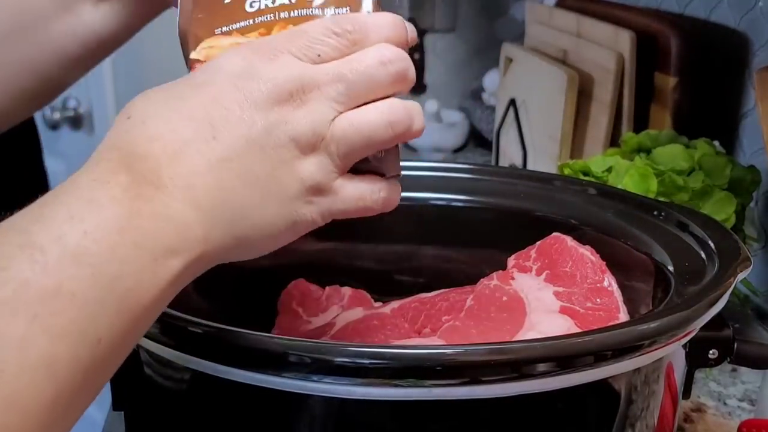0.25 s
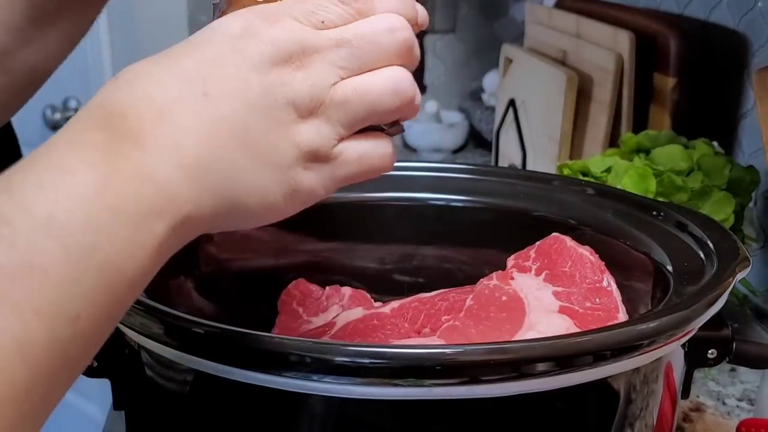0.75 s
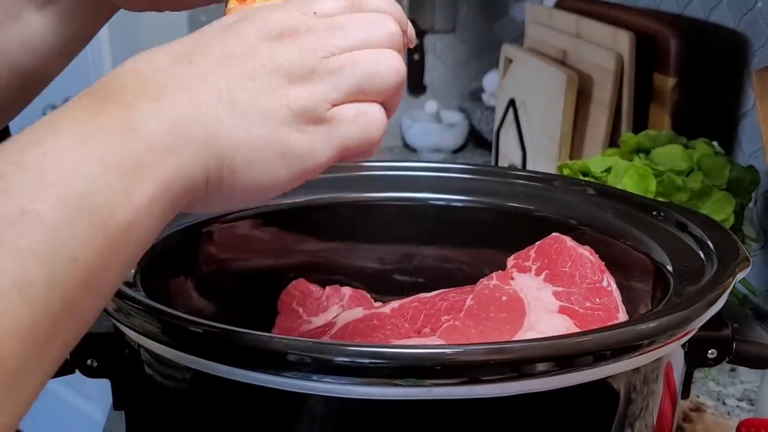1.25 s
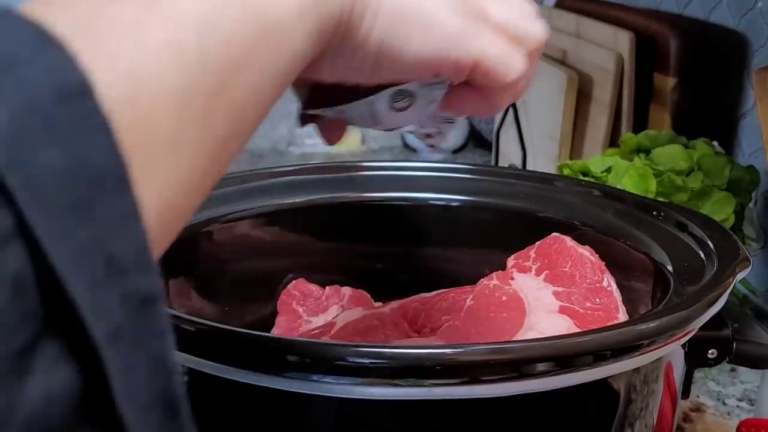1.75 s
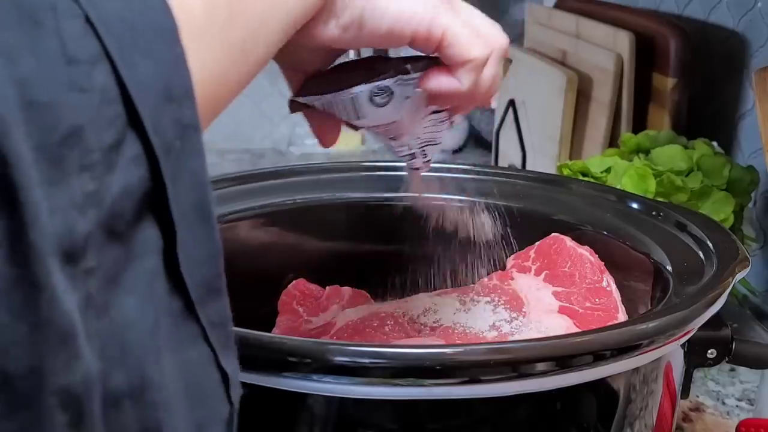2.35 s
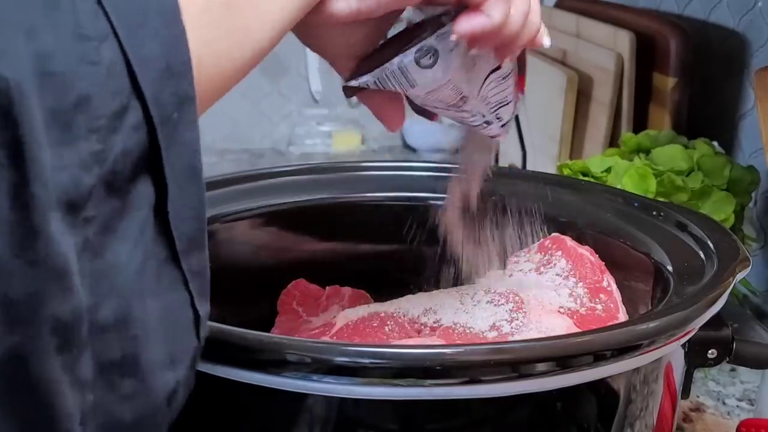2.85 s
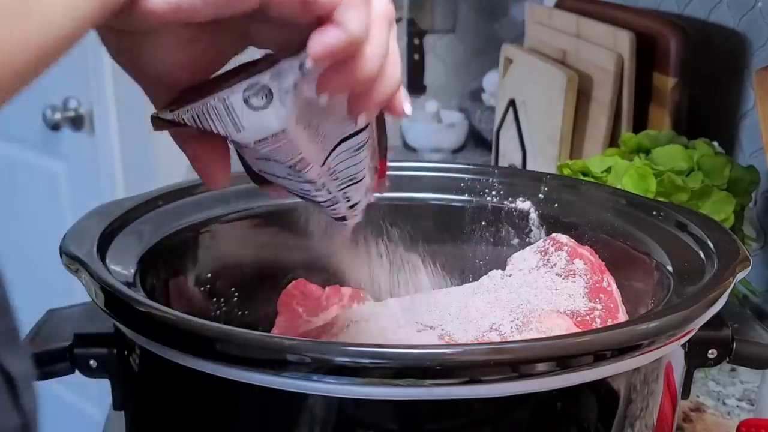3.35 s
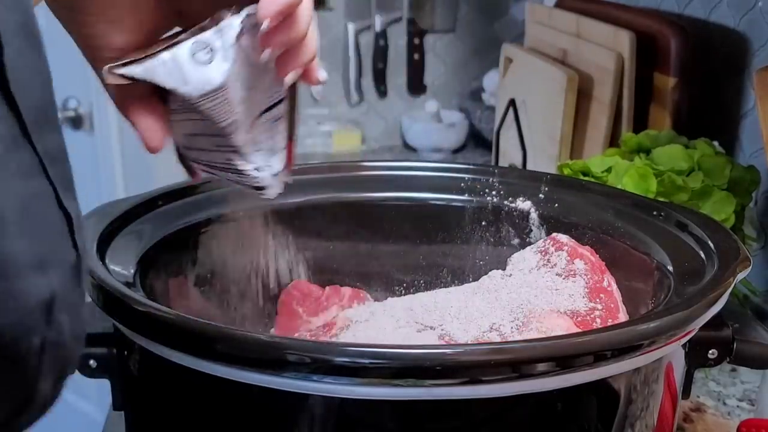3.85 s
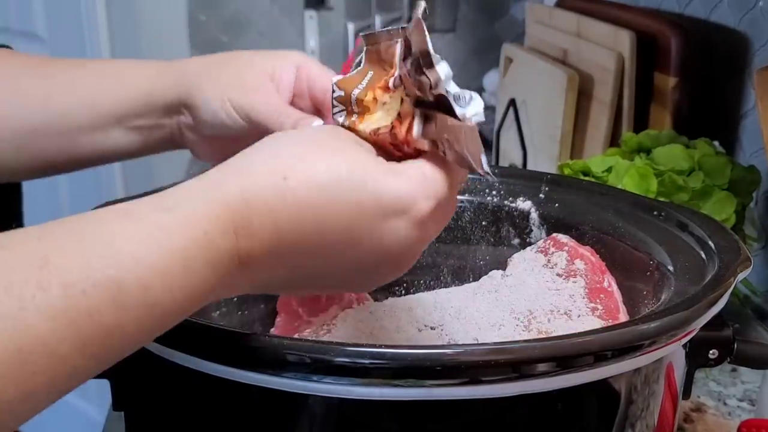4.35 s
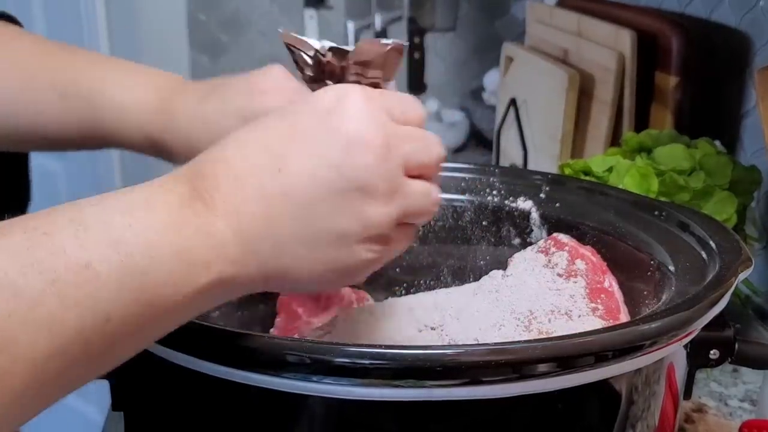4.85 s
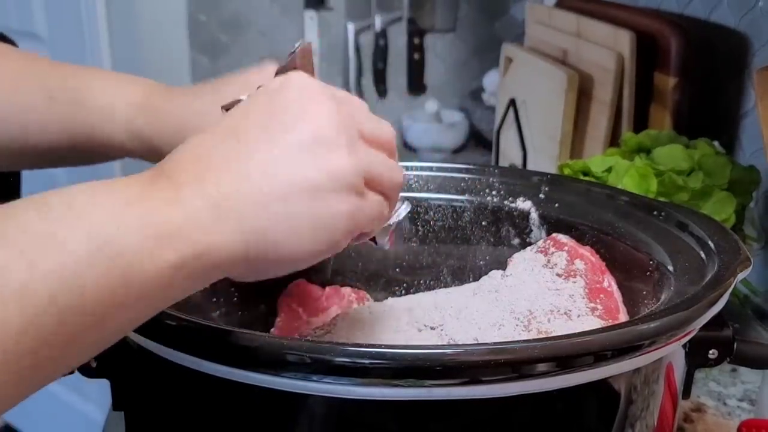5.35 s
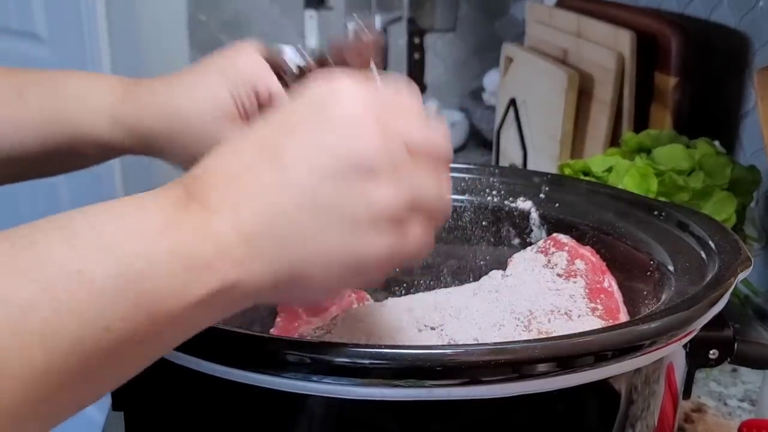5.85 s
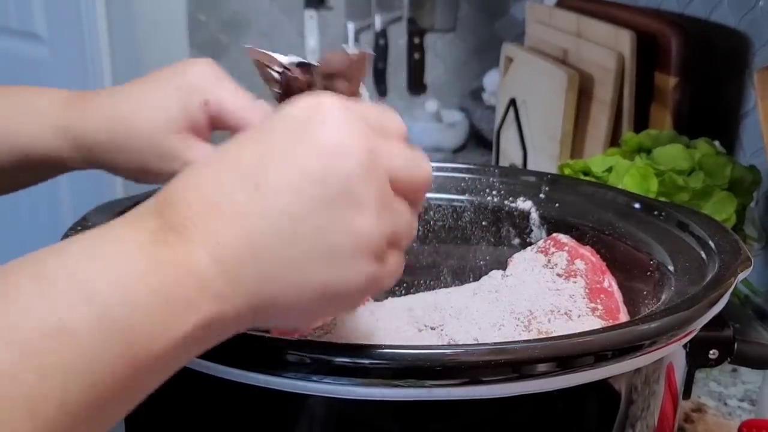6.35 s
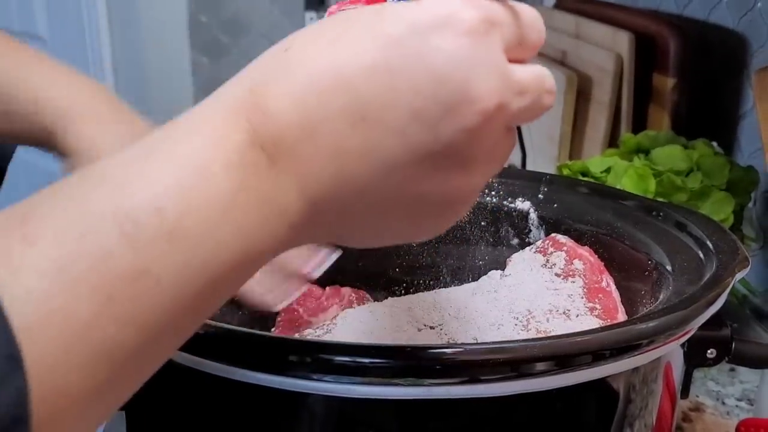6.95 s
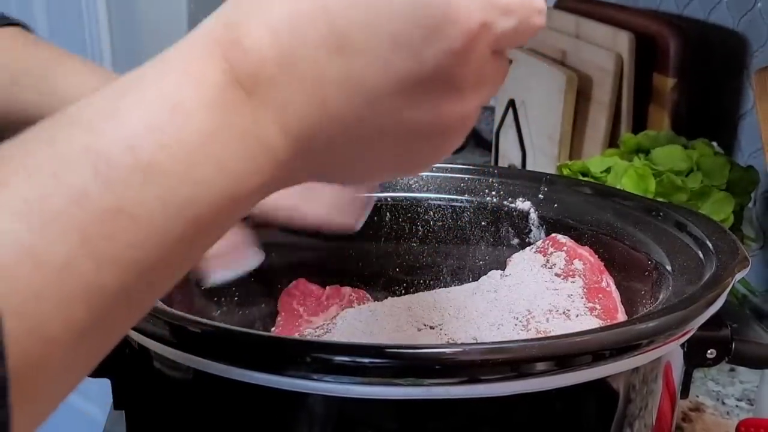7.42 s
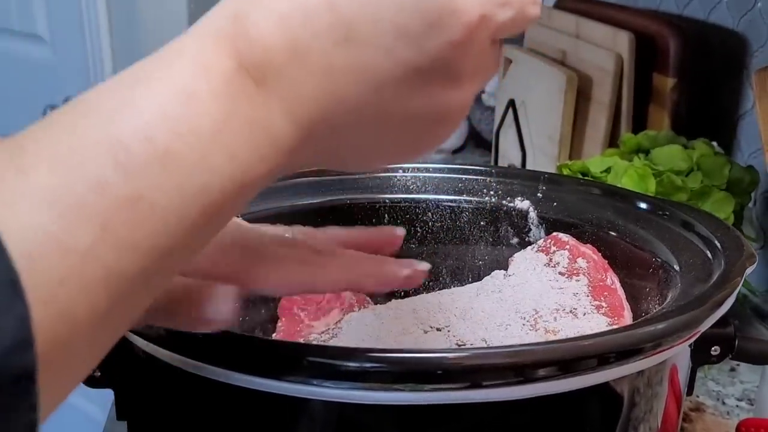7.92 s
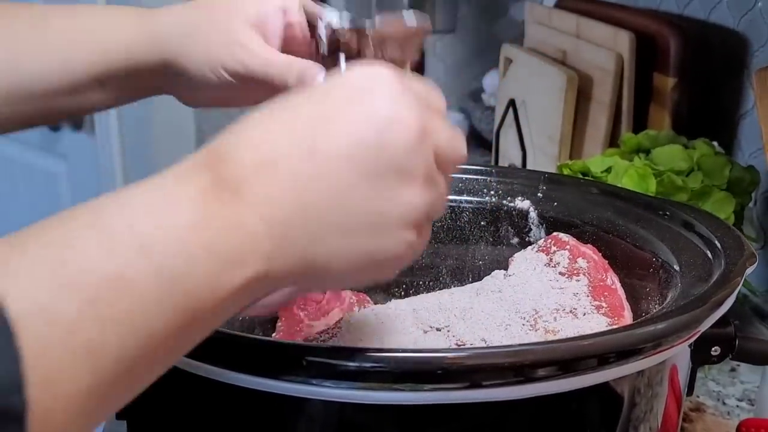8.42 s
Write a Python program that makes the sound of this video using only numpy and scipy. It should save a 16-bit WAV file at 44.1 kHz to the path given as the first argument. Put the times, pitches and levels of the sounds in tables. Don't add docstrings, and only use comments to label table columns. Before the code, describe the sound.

A stiff paper and foil packet pops and crackles near the microphones for a second and a half. After a brief lull, dry powder swishes out in quick shakes, fine and airy. Light crinkling and two louder creases follow, then several dull knocks on a thick ceramic pot with small high ticks and low wobble. The room is small and quiet, with soft air, floor rumble and distant hum.

```python
import sys
import numpy as np
from scipy import signal
from scipy.fft import rfft, irfft
from scipy.io import wavfile

SR = 44100
rng = np.random.default_rng(int(sys.argv[2]) if len(sys.argv) > 2 else 0)


def persist_wave(psi):
    counts = np.round(np.clip(psi, -1, 1) * 32767).astype(np.int16)
    wavfile.write(sys.argv[1], SR, np.atleast_2d(counts).T)


def voltage_ratio(level):
    return 10 ** (np.asarray(level, float) / 20)


N = 382788

# t/s, peak level/dB, panel f/Hz, t60/s, hollow thump against the peak level/dB
FOLDS = [(0.043, -26.5, 2810, 0.048, -16), (0.27, -24, 2150, 0.043, -19), (0.402, -50.5, 1100, 0.06, 6),
         (0.45, -25.5, 1480, 0.053, -8), (0.742, -33.5, 1160, 0.078, -8), (0.756, -22, 2120, 0.045, -10),
         (1.156, -39, 1320, 0.1, -36), (1.226, -33, 1920, 0.049, -3), (1.249, -24, 1973, .081, -5.5),
         (1.334, -26.5, 1180, 0.055, -20), (1.378, -18, 1400, 0.027, -20), (1.482, -45, 1310, 0.042, -25),
         (4.197, -33.5, 2490, 0.05, -18), (5.298, -45.5, 2930, 0.051, 1), (5.819, -48.5, 1360, .049, 2),
         (6.215, -38, 2914, 0.15, -13), (8.668, -32, 1420, .03, -9)]
# t/s, peak level/dB, panel f/Hz, crack and hollow thump against it level/dB
CRACKS = [(0.318, -35.5, 1330, -2, 6), (0.511, -20.5, 1310, -14, -16), (0.535, -15.5, 1205, -19, -13),
          (0.597, -28, 1394, -13, -9), (1.032, -41, 1330, -5, -3), (1.254, -26, 2024, -14, -2),
          (1.424, -44.5, 1940, -2, -4), (1.459, -32, 1065, -11, -21), (1.666, -43.5, 1390, -9, -15),
          (3.717, -51, 2600, 4.5, -29), (4.187, -43, 1620, 0, -5), (4.534, -45, 1820, -1, 1),
          (4.658, -39.5, 2660, -2.5, -11), (4.704, -43, 2950, -1, -15), (4.742, -42.5, 3600, -1, -25),
          (4.789, -38, 2500, 2, -9), (4.814, -35.5, 1260, -11, -21), (5.05, -49, 2990, -0.5, 7.5),
          (5.458, -47.5, 2620, 2.5, -7), (5.52, -26.5, 1350, -9, -8), (5.571, -16.5, 1553, -14, -12),
          (5.71, -29, 1540, -9, -0.5), (5.734, -29, 2150, -12, -8.5), (6.388, -32.5, 2500, -13, -38)]


def snaps():
    fold_crack_db = -41
    found = [(s, db, hz, fold_crack_db, t60, hollow) for s, db, hz, t60, hollow in FOLDS]
    for s, db, hz, crack, hollow in CRACKS:
        t60 = .057 + .0005 * (db + 38.5)
        found.append((s, db, hz, crack, t60, hollow))
    return sorted(found)


# t/s, left-right level/dB
HAND_SIDE = [
    (0, -0.5),
    (1.4, 0),
    (1.7, 2.5),
    (8.68, -6.5),
]


def creases():
    panel_ratios, panel_width_hz, panel_db = (.56, 1.05, 1.4, 2.05), 118, -0.5
    size = 6000
    out = np.zeros((2, N))
    for s, peak_db, hz, crack_db, t60, hollow_db in snaps():
        click = np.zeros((2, size))
        click[:, [40, rng.integers(70, 130), rng.integers(140, 240)]] = 1, -.45, .3
        ring = band(click, hz / 2.6, hz * 1.45, order=3)
        ring = ring + voltage_ratio(-5) * band(click, hz / 1.22, hz * 1.18)

        rough = burst(t60, size) * voltage_ratio(2.04 * rng.exponential(1, size))
        driven = rough + 9 * click
        tones = sum(resonate(driven, hz * ratio, panel_width_hz) for ratio in panel_ratios)
        flutter = band(rough, hz / 2.45, hz * 1.467, order=3)
        flutter = peak_one(flutter + voltage_ratio(panel_db) * peak_one(tones))

        slow = np.clip(t60 / .15, .15, .9)
        hollow = band(driven, 310, 947, order=3)
        crack = band(burst(t60, size), 1900, 8700)
        snap = peak_one((1 - slow) * ring + slow * flutter)
        snap = snap + voltage_ratio(hollow_db) * hollow + voltage_ratio(crack_db) * crack
        add(out, s, snap, peak_db + 2.5, np.interp(s, *np.transpose(HAND_SIDE)))
    return out


# t/s, peak level/dB, f/Hz
PIPS = [
    (2.4055, -48, 1825),
    (2.5591, -54, 2150),
    (2.599, -48, 1850),
    (2.7563, -48, 1810),
]


def pips():
    out = np.zeros((2, N))
    for s, peak_db, hz in PIPS:
        ring = modes([(hz, 0, .07)], size=4000, spread_db=0, detune=0)
        add(out, s, ring[[0, 0]], peak_db, -1.5)
    return out


# peak t/s, hiss level/dB, rise t/s, fall t/s, body against hiss level/dB
RUBS = [(0.02, -52.5, 0.24, 0.13, 7), (0.69, -66, 0.19, 0.09, 16), (0.775, -69, 0.084, 0.056, 16),
        (0.845, -57, 0.053, 0.059, 8), (1.09, -58, 0.08, 0.12, 14.5), (1.28, -72, 0.13, .15, 13),
        (1.66, -70.5, 0.25, 0.095, 12.5), (4.2, -55.5, 0.047, 0.13, 9), (4.71, -55, 0.12, 0.1, 2.5),
        (4.81, -61, 0.19, 0.17, 9), (5.07, -70, 0.16, .05, 10.5), (5.19, -61, 0.036, 0.072, 5.5),
        (5.735, -60, 0.057, 0.11, 13), (5.96, -69, 0.3, 0.083, 11.5), (6.08, -70.5, 0.076, 0.063, 15),
        (6.5, -63, 0.02, 0.088, -7), (6.58, -62, 0.18, 0.063, 5.5), (6.89, -66.5, .16, 0.11, -1),
        (6.8, -66.5, 0.0085, 0.13, 15), (7.61, -72, .04, 0.077, 10), (7.92, -68, 0.23, 0.23, 9),
        (8.27, -64.5, 0.14, 0.063, -5), (8.465, -75, 0.02, 0.046, 3), (8.555, -78, 0.035, 0.054, 7)]


def rubbing_powers():
    rest_db, rest_body_db = -83, 10
    s, rub_db, rise_s, fall_s, body_db = np.transpose(RUBS)
    snap_s, snap_db, _, crack_db = np.transpose(snaps())[:4]
    tap_s, tap_db = np.transpose(TAPS)[:2]

    hiss = swells(s, rub_db, rise_s, fall_s) + voltage_ratio(2 * rest_db)
    hiss = hiss + swells(snap_s, snap_db + crack_db - 27, 0, 0.1)
    hiss = hiss + swells(tap_s, tap_db - 42, 0, 0.1)

    panels = swells(s, rub_db + body_db, rise_s, fall_s) + voltage_ratio(2 * (rest_db + rest_body_db))
    panels = panels + swells(snap_s, snap_db - 31.5, 0, 0.091)
    return hiss, panels


# t/s, hiss level/dB
POUR = [
    (1.9, -95),
    (2.15, -72),
    (2.7, -68),
    (3.0, -63),
    (3.3, -65.5),
    (3.7, -70),
    (3.9, -77),
    (4.14, -66.5),
    (4.3, -92),
]
# peak t/s, hiss level/dB
SHAKES = [(1.96, -66), (1.995, -64), (2.115, -59.5), (2.335, -71), (2.405, -63), (2.555, -67.5),
          (2.645, -75), (2.711, -59), (2.86, -60), (2.98, -60), (3.1, -55), (3.27, -63.5), (3.545, -61),
          (3.615, -69), (3.75, -67), (3.91, -68), (4.09, -72)]


def pouring_power():
    stream_db = np.interp(np.arange(N) / SR, *np.transpose(POUR))
    rise_s, fall_s = 0.039, 0.061
    return voltage_ratio(2 * stream_db) + swells(*np.transpose(SHAKES), rise_s, fall_s)


# f/Hz, width f/Hz, level/dB
PACKET = [(1530, 240, 1), (1778, 31, 0.5), (2150, 310, 0), (2790, 450, 4.5), (3330, 1450, 7.5),
          (1200, 1960, 6)]


def packet_panels():
    clumps = voltage_ratio(3.0 * np.minimum(rng.exponential(1, N), 5))
    panels = 0
    for hz, width_hz, level_db in PACKET:
        knocks = rng.standard_normal((2, N)) * clumps
        level = voltage_ratio(level_db + 3.3 * drift(16.4))
        panels = panels + level * resonate(knocks, hz, width_hz) / np.sqrt(width_hz)
    return rms_one(panels)


# f/Hz, level/dB per Hz
HISS = [(1470, -30), (2500, -9.5), (4110, -1), (4440, 0), (10000, -1.5), (11500, 0), (14900, -4),
        (16000, -11)]


def powder():
    rubbing, shaken = rubbing_powers()
    pouring = pouring_power()
    shaken = shaken + pouring * voltage_ratio(2 * 4.5)

    uneven = voltage_ratio(2.0 * np.minimum(rng.exponential(1, (2, N)), 6))
    hiss = coloured(HISS, rng.standard_normal((2, N)) * uneven)
    fine = signal.sosfiltfilt(signal.butter(2, 10000, "high", fs=SR, output="sos"), hiss)
    fine_power = rubbing * voltage_ratio(2 * -2.3) + pouring * voltage_ratio(2 * 4)
    grains = np.sqrt(rubbing + pouring) * (hiss - fine) + np.sqrt(fine_power) * fine

    body = np.minimum(voltage_ratio(-2.5) * np.sqrt(shaken), voltage_ratio(-48)) * packet_panels()
    surge = voltage_ratio(1.88 * drift(34))
    return surge * (voltage_ratio(7.0) * grains + body) * voltage_ratio([[-1.2], [1.2]])


# t/s, peak level/dB, hardness level/dB, slap t60/s, thud against slap level/dB
TAPS = [
    (6.787, -30.5, -5.5, 0.15, -17),
    (6.89, -56.5, -17, 0.048, 12),
    (7.111, -22.5, -0.5, 0.11, -10),
    (7.326, -31.5, -32, 0.16, -6),
    (7.368, -36, -14, 0.031, -1.5),
    (7.535, -30.5, -43, 0.071, -8.5),
    (7.556, -27, -28, 0.075, -10.5),
    (7.8116, -29, -11, 0.086, -6.5),
    (8.197, -54, -25, 0.026, 0.5),
]
# f/Hz, level/dB, t60/s
POT = [(270, -12, .25), (415, -11, .07), (480, -11, .07), (590, -4, .12), (625, 0, .16), (716, -2, .12),
       (813, -5, .08), (955, -10, .07), (1150, -8, .06), (1290, -7, .07), (1425, -6, .07), (1560, -8, .06),
       (1990, -8, .06)]


def taps():
    size = 12000
    t = np.arange(size) / SR
    out = np.zeros((2, N))
    for s, peak_db, hard_db, t60, thud_db in TAPS:
        slap = band(burst(t60, size), 440, 1880, order=3)
        slap = slap + voltage_ratio(hard_db) * band(burst(0.37 * t60, size), 1260, 4060, order=3)
        thud = modes([(213, 2, .075)], size, spread_db=0, detune=.04)[:1]
        thud = thud + voltage_ratio(-5.5) * band(burst(0.2, size)[:1], 106, 380)
        thud = thud * (1 - np.exp(-t / 0.011)) * voltage_ratio(4.5)
        body = peak_one(modes(POT, size, spread_db=2, detune=.007))
        rise = 1 - np.exp(-t / .0015)
        sound = rise * (slap + voltage_ratio(thud_db + 2) * thud + voltage_ratio(-1.0) * body)
        add(out, s, sound, peak_db + 5.0, -1.5)
    return out


# t/s, peak level/dB, bright level/dB, left-right level/dB
NAIL = [
    (7.3541, -27, 5, -1),
    (7.5715, -25, -13, -2),
]
# f/Hz, level/dB, t60/s
WALL = [(2650, -17, .3), (3230, -15, .45), (3310, -15, .35), (3897, -13, .5), (3940, 2, .09),
        (3975, -13, .55), (4899, -10, .55), (4960, -17, .3)]


def nail():
    size = 30000
    out = np.zeros((2, N))
    for s, peak_db, bright_db, pan_db in NAIL:
        tick = band(burst(0.1, size), 2800, 5100)
        tick = tick + voltage_ratio(bright_db) * band(burst(0.096, size), 5800, 15000)
        ring = modes(WALL, size, spread_db=2, detune=.001)[:1]
        add(out, s, tick + voltage_ratio(-16) * ring, peak_db + 0.5, pan_db)
    return out


# peak t/s, lower mode level/dB, upper mode level/dB, rise t/s, fall t/s
PUSHES = [
    (6.805, -51, -49.5, 0.034, 0.33),
    (6.95, -50, -40.5, 0.19, 0.12),
    (7.13, -54, -47, .03, 0.16),
    (7.2, -45.5, -49, 0.18, 0.068),
    (7.375, -40, -39, 0.056, 0.11),
    (7.6, -43, -50, 0.12, 0.14),
    (7.85, -50, -43, 0.055, 0.1),
    (8.25, -57, -65, .15, .12),
]


def rocking():
    t = np.arange(N) / SR
    s, lower_db, upper_db, rise_s, fall_s = np.transpose(PUSHES)
    swing = 0
    for level_db, hz in ((lower_db, 63.4), (upper_db, 82.2)):
        level = np.sqrt(2 * swells(s, level_db, rise_s, fall_s))
        swing = swing + level * np.sin(2 * np.pi * hz * t)
    return swing * voltage_ratio([[-2.5], [2.5]])


def kitchen(x):
    t60_s, wall_cut_hz = 0.5, 3500
    t = np.arange(SR // 2) / SR
    dull = np.exp(-2 * np.pi * wall_cut_hz / SR)
    echoes = signal.lfilter([1], [1, -dull], rng.standard_normal((2, len(t))))
    echoes = echoes * voltage_ratio(-60 * t / t60_s) * (t > .006)
    echoes = echoes / np.sqrt(np.sum(echoes ** 2) / 2)
    return signal.fftconvolve(x, echoes, axes=1)[:, :N]


# f/Hz, level/dB per Hz
AIR = [(12, -76), (20, -22), (98, -6), (228, -14.5), (319, -11), (513, -12.5), (1030, -23.5), (1260, -19),
       (1480, -22), (7110, -43), (8410, -55), (14300, -44), (16000, -37)]
# peak t/s, rumble level/dB, length t/s
STIRS = [
    (1.55, -61.5, 0.99),
    (6.902, -58, 0.23),
    (7.4, -59, 0.35),
    (7.9, -58, 0.27),
    (8.24, -65, .2),
]


def background():
    air = voltage_ratio(-60) * coloured(AIR, rng.standard_normal((2, N)))

    s, stir_db, length_s = np.transpose(STIRS)
    rumble_power = voltage_ratio(2 * -75.5) + swells(s, stir_db, length_s, length_s)
    rumble = np.sqrt(rumble_power) * rms_one(band(rng.standard_normal(N), 21, 73))

    drone_hz = 92.4 + 2.315 * drift(5.67)
    turns = np.cumsum(drone_hz) / SR
    drone = voltage_ratio(-62 + 1.15 * drift(5.8)) * np.sqrt(2) * np.sin(2 * np.pi * turns)
    return air + (drone + rumble) * voltage_ratio([[-1.5], [1.5]])


def rms_one(x):
    return x / np.sqrt(np.mean(x ** 2) + 1e-20)


def peak_one(x):
    return x / np.max(np.abs(x), axis=-1, keepdims=True)


def at_hz(points, hz):
    point_hz, value = np.transpose(points)
    return np.interp(np.log(hz), np.log(point_hz), value)


def drift(rate):
    r = np.exp(-80 * np.pi * rate / SR)
    slow = signal.lfilter([1], [1, -2 * r, r * r], rng.standard_normal(N // 40 + 2002))[2000:]
    return np.interp(np.arange(N) / 40, np.arange(len(slow)), rms_one(slow))


# f/Hz, likeness (1 same, -1 opposite)
LIKENESS = [(60, 0.096), (130, 0.87), (290, -0.17), (640, -0.19), (1400, -0.51), (15000, 0.16)]


def coloured(spectrum, white):
    hz = np.maximum(np.arange(N // 2 + 1) * SR / N, 1)
    alike = np.clip(at_hz(LIKENESS, hz), -1, 1)
    mid, side = rfft(white) * voltage_ratio(at_hz(spectrum, hz))
    stereo = np.sqrt(1 + alike) * mid + np.sqrt(1 - alike) * side * [[1], [-1]]
    return rms_one(irfft(stereo, N))


def resonate(x, hz, width_hz):
    r = np.exp(-np.pi * width_hz / SR)
    top = np.array([1, 0, -1]) * (1 - r * r) / 2
    return signal.lfilter(top, [1, -2 * r * np.cos(2 * np.pi * hz / SR), r * r], x)


def burst(t60, size):
    fade = voltage_ratio(-60 * np.arange(size) / SR / np.clip(t60, .004, 1))
    return rng.standard_normal((2, size)) * fade


def band(x, low_hz, high_hz, order=2):
    edges = [low_hz, min(high_hz, .45 * SR)]
    return peak_one(signal.sosfilt(signal.butter(order, edges, "band", fs=SR, output="sos"), x))


def modes(table, size, spread_db, detune):
    hz, level_db, t60 = np.transpose(table)[:, :, None]
    hz = hz * (1 + detune * rng.standard_normal(hz.shape))
    t = np.arange(size) / SR
    shape = (2, len(table))
    strengths = voltage_ratio(spread_db * rng.standard_normal(shape)) * rng.choice([-1, 1], shape)
    return strengths @ (voltage_ratio(level_db - 60 * t / t60) * np.sin(2 * np.pi * hz * t))


def swells(s, peak_db, rise_s, fall_s):
    s, peak_db, rise_s, fall_s = [np.reshape(v, (-1, 1)) for v in (s, peak_db, rise_s, fall_s)]
    ticks = np.arange(0, N + 50, 50)
    t = ticks / SR - s
    span = np.maximum(np.where(t < 0, rise_s, fall_s), .005)
    power = np.sum(voltage_ratio(2 * peak_db - 40 * np.abs(t) / span), axis=0)
    return np.interp(np.arange(N), ticks, power)


def add(out, s, sound, peak_db, pan_db):
    lag = .0005 * rng.uniform(-1, 1)
    for side in (0, 1):
        i = round((s + max(lag * (1 - 2 * side), 0)) * SR)
        level = voltage_ratio(peak_db + pan_db * (1.5 - side))
        out[side, i:i + sound.shape[1]] += level * sound[side, :N - i]


def scene():
    hits = creases() + pips() + taps() + nail()
    return hits + voltage_ratio(-14) * kitchen(hits) + powder() + rocking() + background()


def roll_off(x):
    return signal.sosfilt(signal.butter(12, 16820, fs=SR, output="sos"), x)


def record(dry):
    mix = signal.sosfilt(signal.cheby2(8, 24, 16000, fs=SR, output="sos"), dry)
    return roll_off(mix)


dry = scene()
out = record(dry)
persist_wave(out)
```